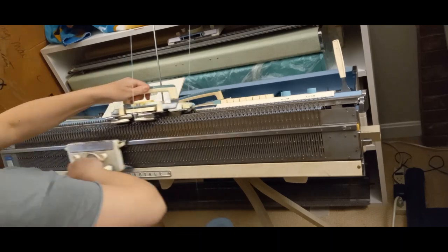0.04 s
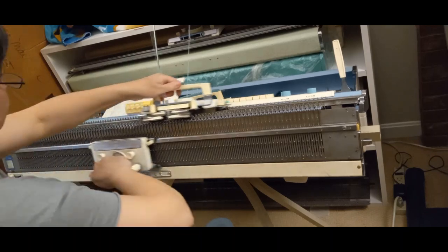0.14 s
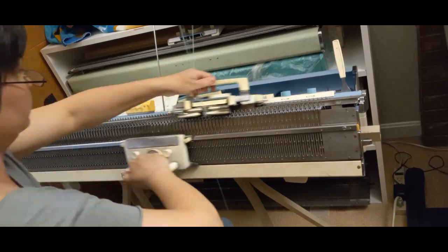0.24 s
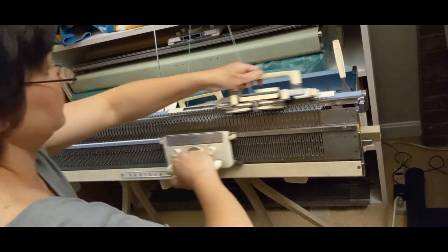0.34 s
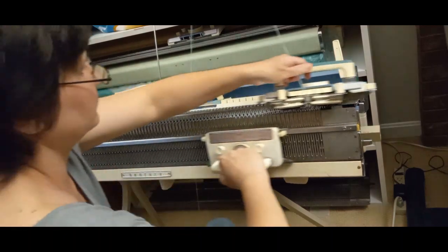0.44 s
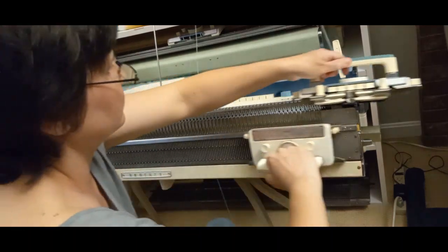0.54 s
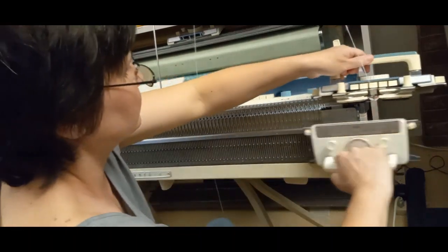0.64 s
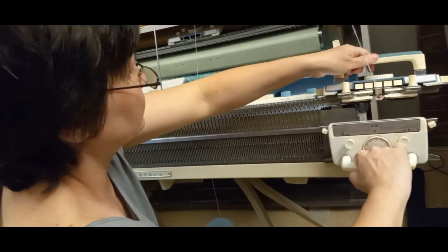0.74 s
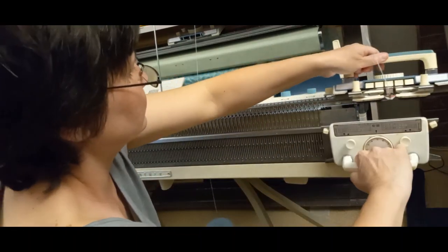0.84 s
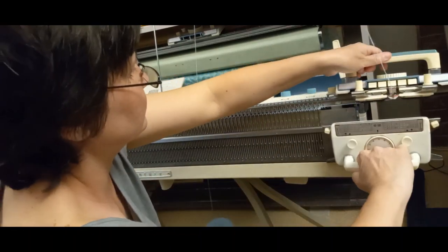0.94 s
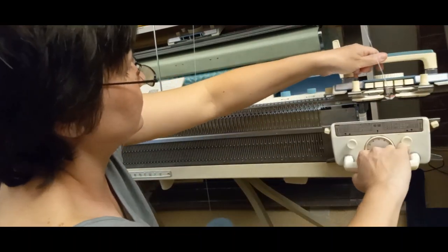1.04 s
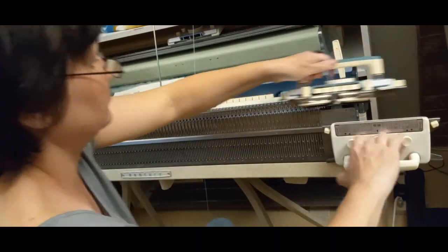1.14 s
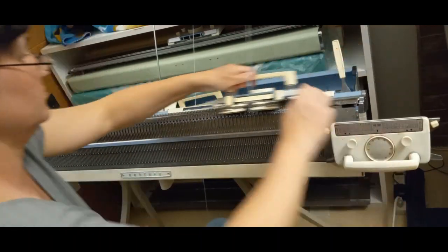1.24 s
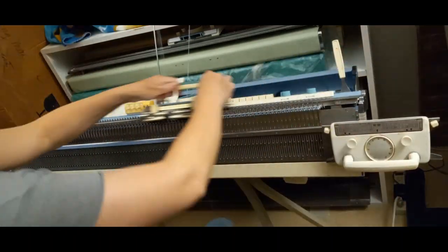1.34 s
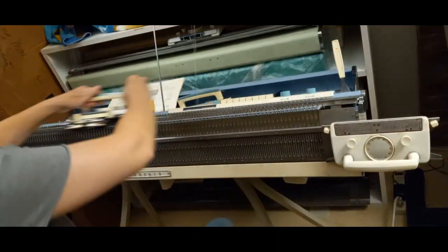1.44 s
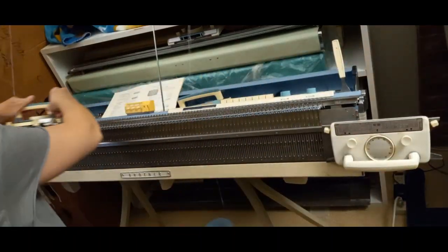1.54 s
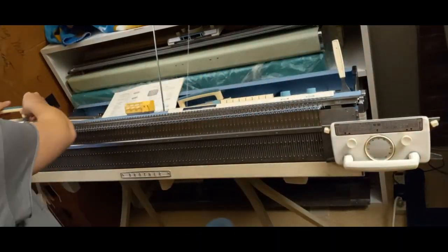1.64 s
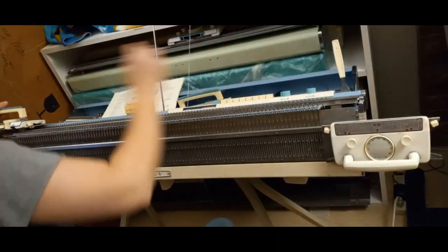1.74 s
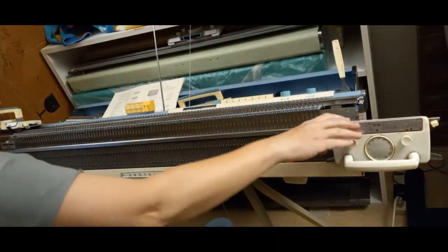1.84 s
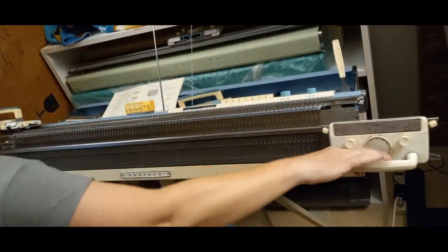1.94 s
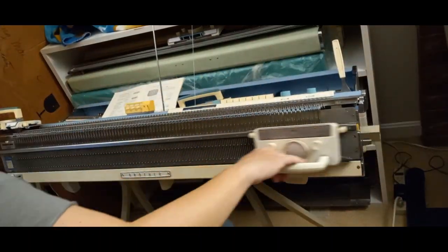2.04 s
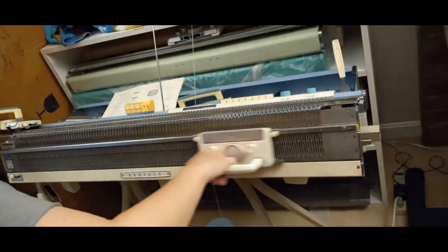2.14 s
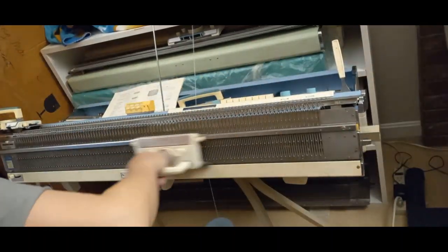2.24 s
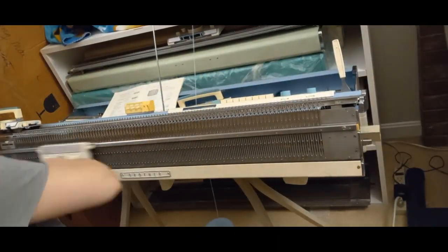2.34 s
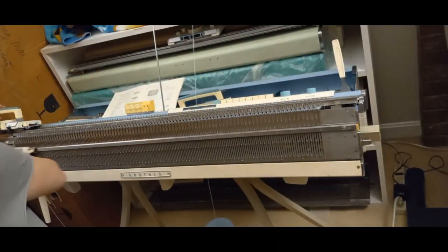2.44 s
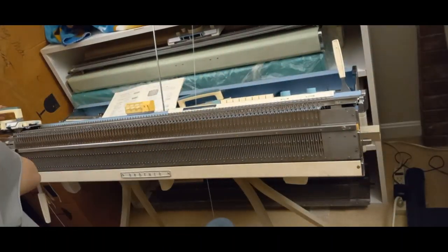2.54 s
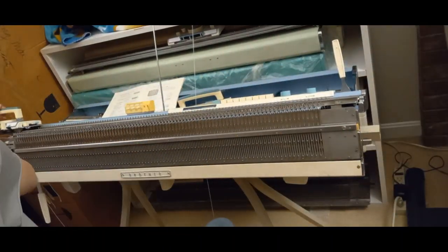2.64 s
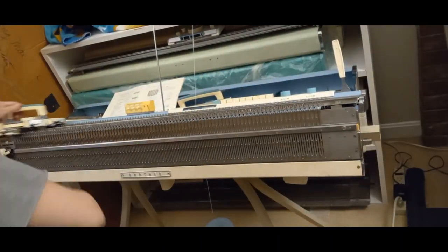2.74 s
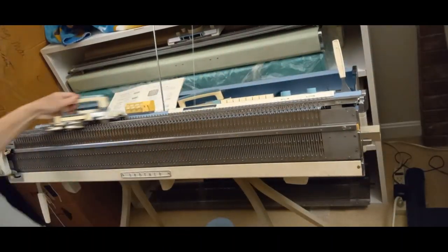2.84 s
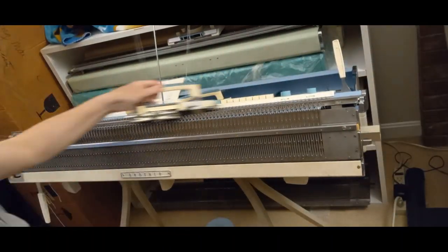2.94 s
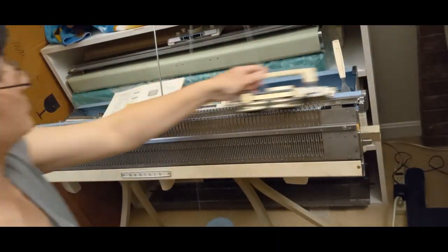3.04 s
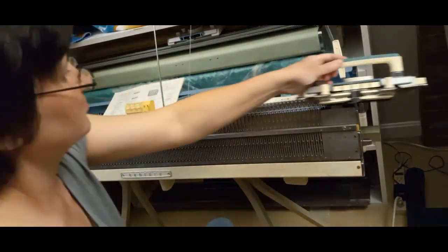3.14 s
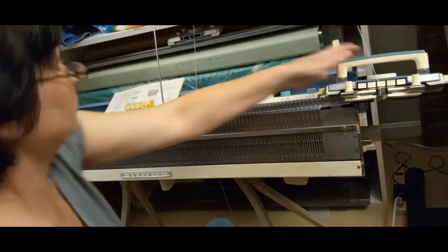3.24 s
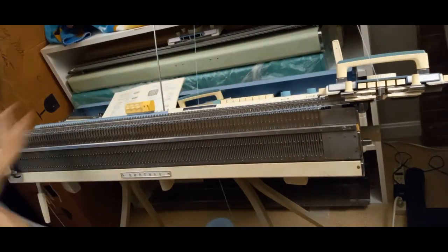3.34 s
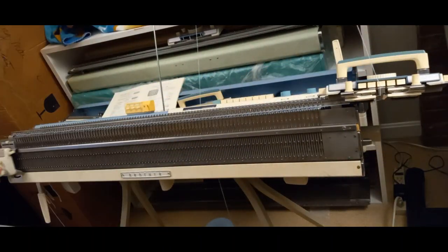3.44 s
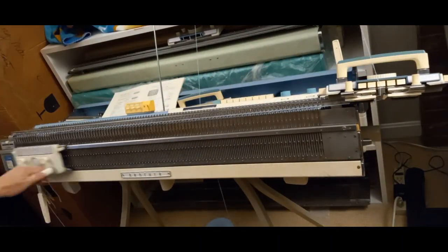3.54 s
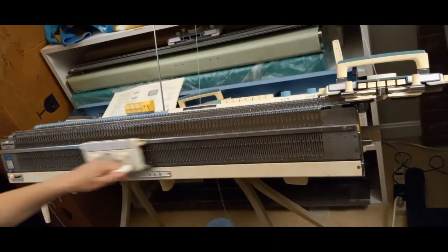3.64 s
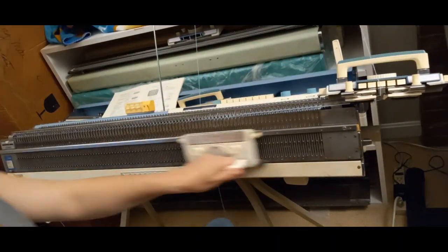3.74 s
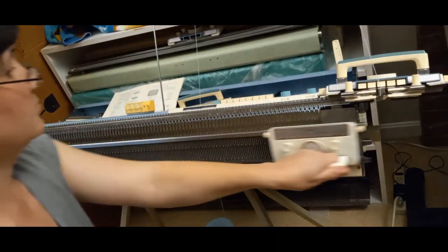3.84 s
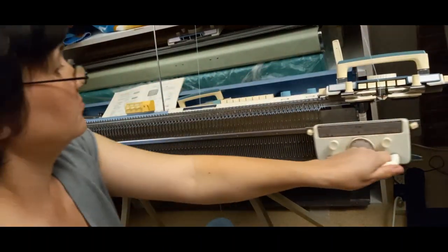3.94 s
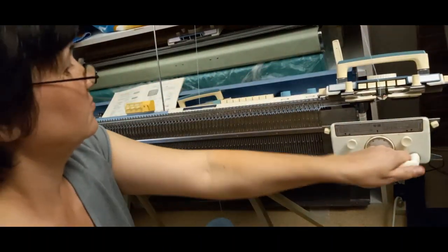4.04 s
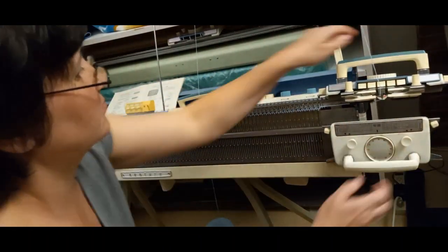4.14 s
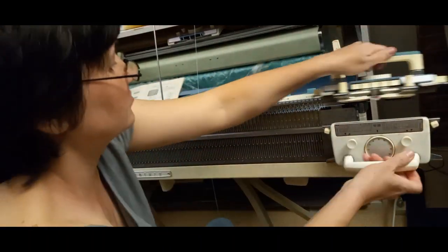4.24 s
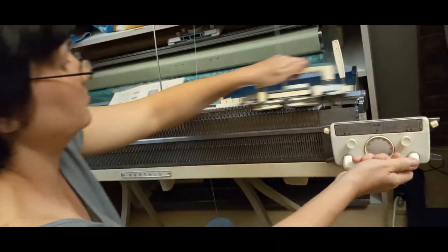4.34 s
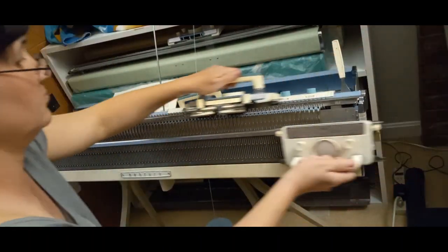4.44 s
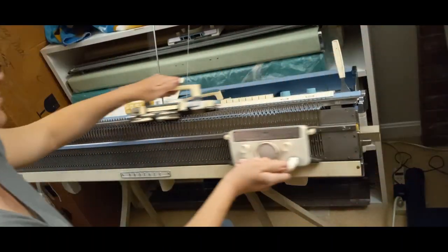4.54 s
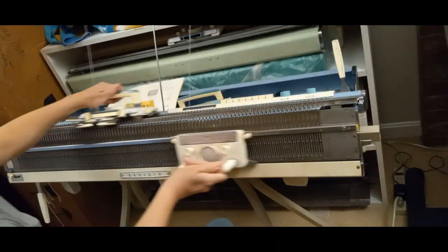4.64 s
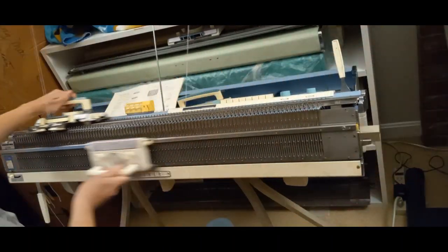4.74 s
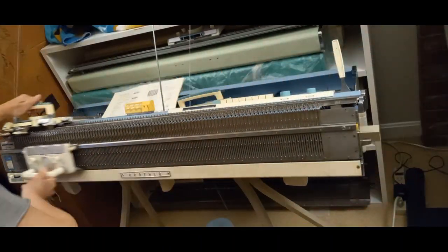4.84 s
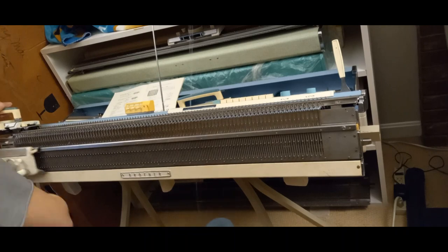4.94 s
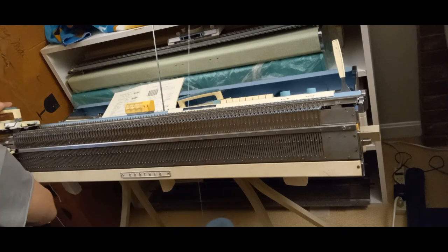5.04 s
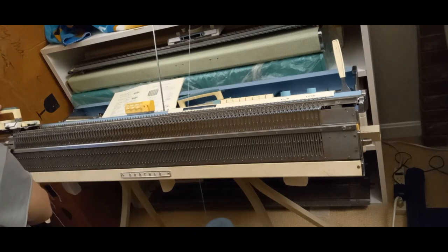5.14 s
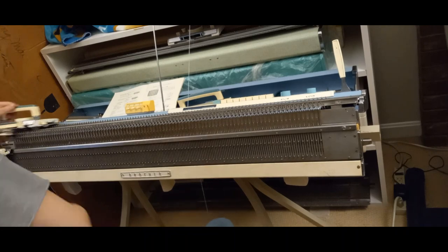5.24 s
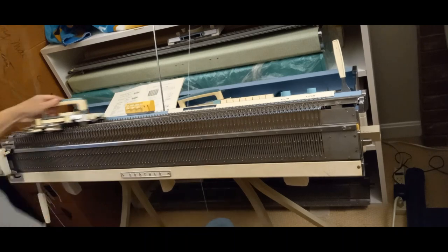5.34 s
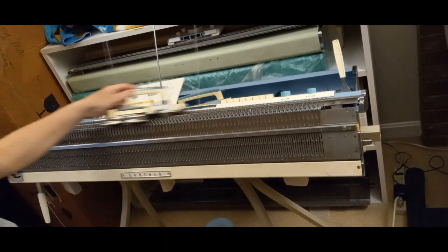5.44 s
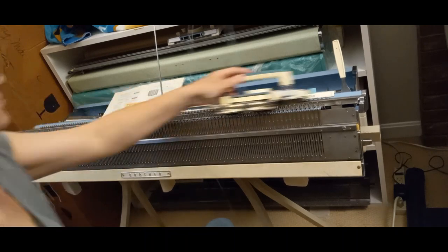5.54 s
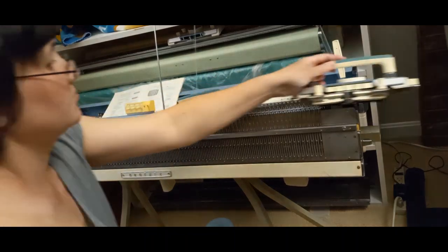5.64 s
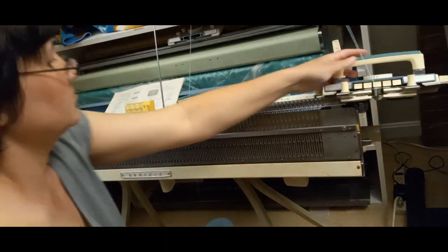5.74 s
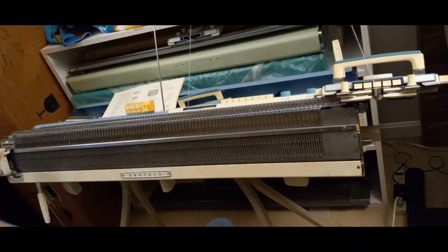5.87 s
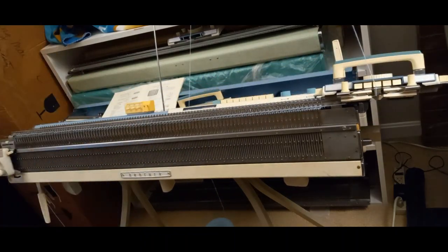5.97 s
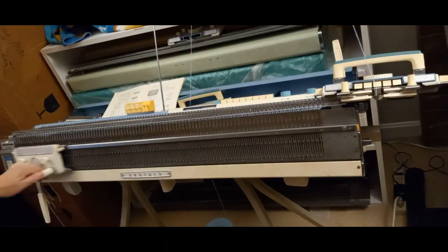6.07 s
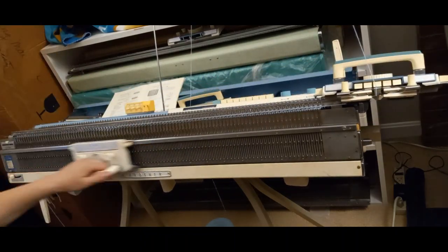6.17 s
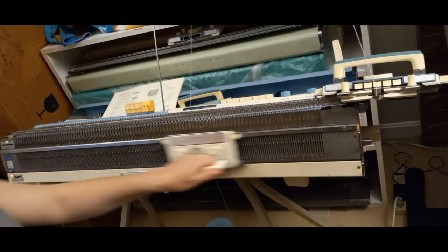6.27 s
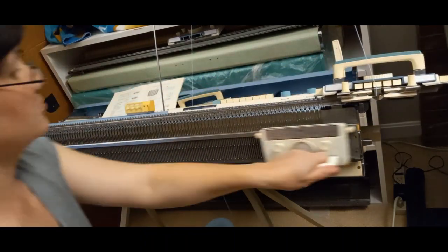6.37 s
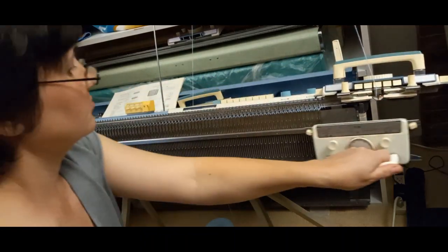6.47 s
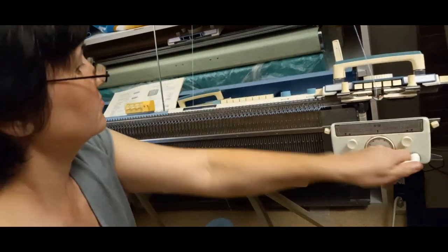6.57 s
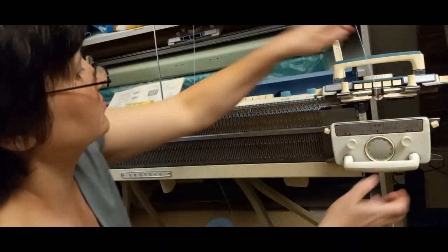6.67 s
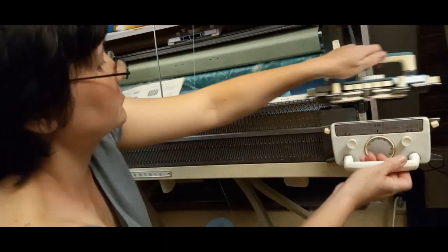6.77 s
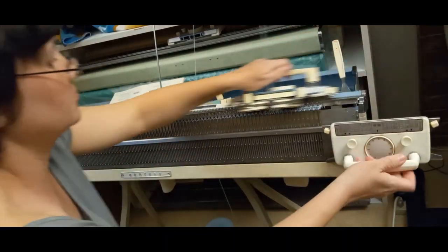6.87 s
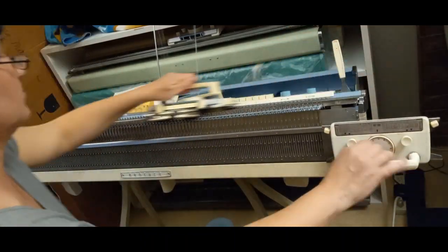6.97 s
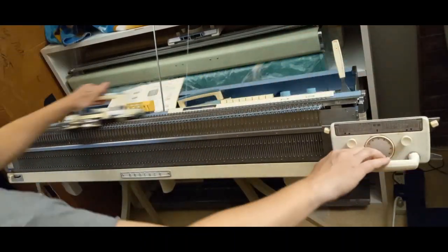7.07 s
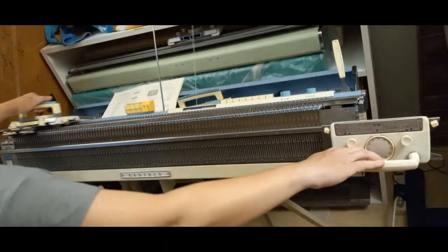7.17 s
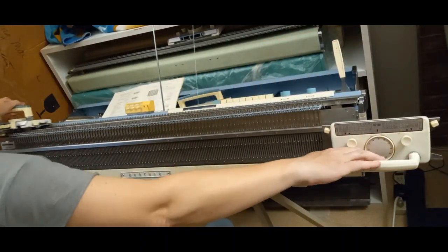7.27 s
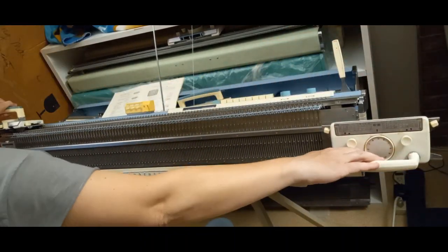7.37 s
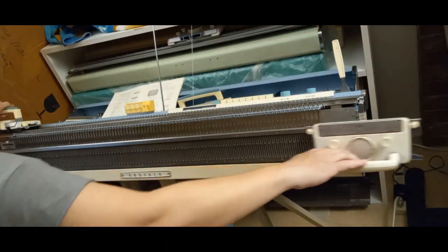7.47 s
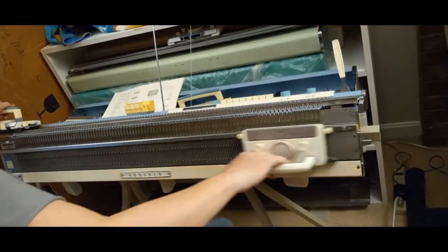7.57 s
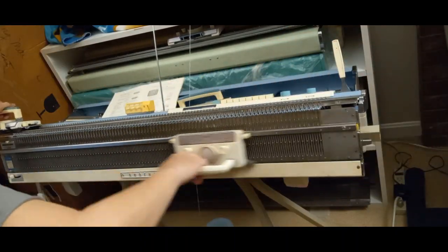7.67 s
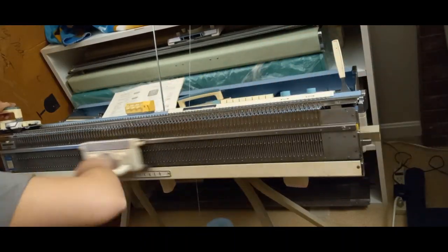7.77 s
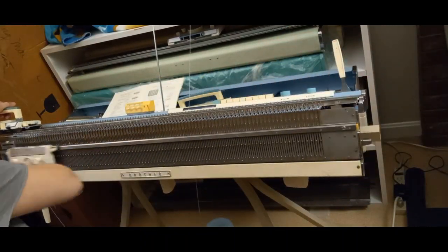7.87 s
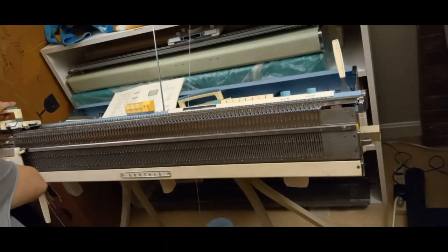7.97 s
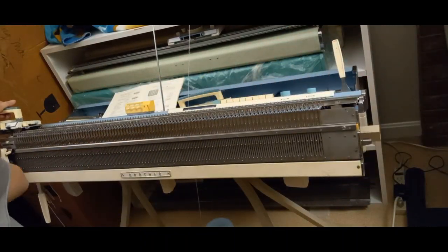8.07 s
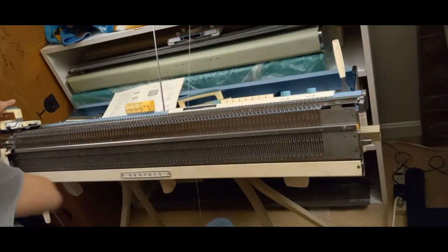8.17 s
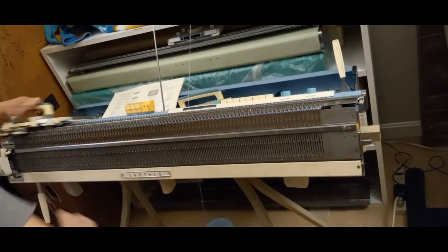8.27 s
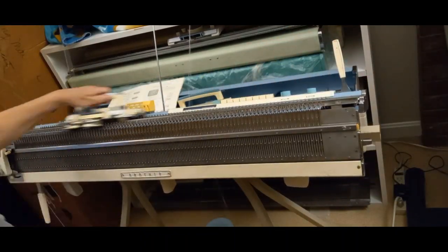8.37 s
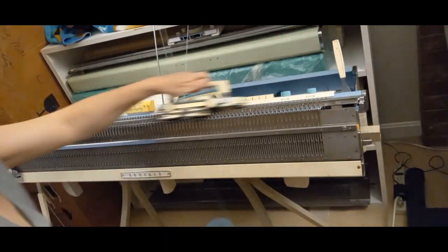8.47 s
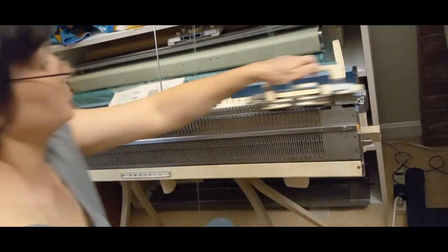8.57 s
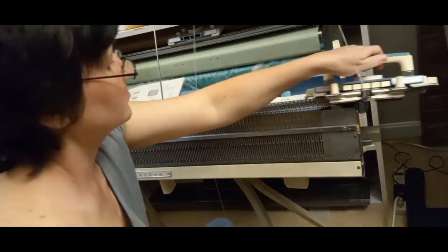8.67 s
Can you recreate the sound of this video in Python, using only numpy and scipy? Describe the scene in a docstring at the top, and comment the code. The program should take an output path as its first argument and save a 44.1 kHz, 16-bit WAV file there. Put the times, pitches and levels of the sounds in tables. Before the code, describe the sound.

Harsh rasping slides of two knitting machine carriages sweep back and forth over needle beds, with sharp clacks at each end, in a small room.

```python
"""Close stereo pair at a hand-pushed knitting machine in a small soft room, with hiss and a low wavering hum.
Both carriages run first, then after clicks and a short move the metal one on the back bed and the plastic
one on the front bed take turns; both run once more midway, then the turns go on to the end.
Their cams knock needle butts, random spikes in noise that blur to a rasp whose level follows the speed.
Levers and stops click as bursts of dying noise and ringing modes; hands and yarn brush between passes."""
import sys
import numpy as np
from scipy import signal
from scipy.fft import rfft, irfft, next_fast_len
from scipy.io import wavfile

SR = 44100
rng = np.random.default_rng(int(sys.argv[2]) if len(sys.argv) > 2 else 0)


def inscribe(sig):
    """Save sig as 16-bit PCM at rate SR to the path in sys.argv[1].

    A 1-D sig is mono; a 2-D sig holds one channel per row.
    Samples are clipped to [-1, 1] before scaling.
    """
    pcm = np.round(np.clip(np.atleast_2d(sig).T, -1, 1) * 32767)
    wavfile.write(sys.argv[1], SR, pcm.astype(np.int16))


N = 384111
SLOW_T = np.arange(N // 40 + 2) * 40 / SR   # s, one step every 40 samples


def amp(db):
    """Gain of a level in dB."""
    return 10 ** (np.asarray(db) / 20)


def rms_one(x):
    """Scaled to rms 1."""
    return x / np.sqrt(np.mean(x ** 2) + 1e-20)


def at_hz(points, hz):
    """A spectrum read on a log-frequency axis."""
    points = np.array(points)
    return np.interp(np.log(hz), np.log(points[:, 0]), points[:, 1])


def smooth(slow):
    """A value given at every 40th sample, at every sample."""
    return np.interp(np.arange(N) / 40, np.arange(len(slow)), slow)


def drift(rate_hz):
    """Slow random wander of rms 1, at every 40th sample: noise through two equal low-passes."""
    r = np.exp(-80 * np.pi * rate_hz / SR)
    white = rng.standard_normal(N // 40 + 2002)
    return rms_one(signal.lfilter([1], [1, -2 * r, r * r], white)[2000:])   # settled part only


def band(x, low_hz, high_hz):
    """Band-pass."""
    return signal.sosfilt(signal.butter(2, [low_hz, high_hz], "band", fs=SR, output="sos"), x)


def resonance(x, hz, width_hz):
    """Two-pole peak, gain 1 on top."""
    r = np.exp(-np.pi * width_hz / SR)
    zeros = np.array([1, 0, -1]) * (1 - r * r) / 2
    poles = [1, -2 * r * np.cos(2 * np.pi * hz / SR), r * r]
    return signal.lfilter(zeros, poles, x)


def hiss(colour):
    """Steady stereo noise of a given spectrum, mid rms 1."""
    size = next_fast_len(N)
    grid_hz = np.maximum(np.fft.rfftfreq(size, 1 / SR), 1)
    spectrum = rfft(rng.standard_normal((2, size))) * amp(at_hz(colour, grid_hz))
    out = irfft(spectrum, size)[:, :N]
    return out / np.std(out.mean(0))


def stereo(mid_side, hz):
    """Left and right as alike and as balanced as the two microphones are at this pitch."""
    # likeness of the two microphones: pitch_hz, likeness (-1 to 1)
    likeness = [(60, -0.03), (150, 0.021), (380, 0.13), (950, 0.15), (2380, 0.25), (5980, 0.086),
                (15000, -0.08)]
    # balance of the two microphones: pitch_hz, left_over_right_db
    lean = [(60, -1.5), (180, -1.5), (550, -1), (1650, -0.5), (4970, -0.5), (15000, 0.5)]
    alike = at_hz(likeness, hz)
    mid = np.sqrt(1 + alike) * mid_side[0]
    side = np.sqrt(1 - alike) * mid_side[1]
    pair = mid + side * [[1], [-1]]
    return pair * amp(at_hz(lean, hz) * np.array([[.5], [-.5]]))


def room():
    """Steady hiss of the room and a low hum, a band of noise whose level wavers."""
    # spectrum of the hum: pitch_hz, relative density_db per Hz
    hum_colour = [(88, -65), (150, -29), (204, -15.5), (308, 3), (345, 2.5), (432, -3), (498, 0),
                  (583, -10.5), (633, -11), (792, -7.5), (900, -17), (1170, -50), (1980, -120)]
    # course of the hum: time_s, level_db
    hum_course = [(0.849, -54), (1.099, -47), (1.821, -55), (1.969, -47.5), (2.699, -58), (3.349, -54.5),
                  (4.149, -55), (5.239, -53), (5.899, -56.5), (6.599, -57.5), (6.739, -51.5),
                  (7.459, -53.5), (8.207, -56)]
    # spectrum of the room hiss: pitch_hz, relative density_db per Hz
    room_colour = [(18, -70), (30, -40), (124, -21), (266, -5), (328, -10), (486, -22), (649, -7),
                   (1250, 1), (1670, -4.5), (14800, -23.5), (16000, -25)]
    time_s, hum_db = np.transpose(hum_course)
    hum = amp(np.interp(np.arange(N) / SR, time_s, hum_db)) * hiss(hum_colour)
    return hum + amp(-58.5) * hiss(room_colour)


def tail(x):
    """Short diffuse echo of a soft room: dying noise, a different one on each side."""
    t60_s, gap_s = 0.051, 0.004
    t = np.arange(SR // 3) / SR
    echo = rng.standard_normal((2, len(t))) * amp(-60 * t / t60_s) * (t > gap_s)
    echo = echo / np.linalg.norm(echo, axis=1, keepdims=True)
    return signal.fftconvolve(x, echo, axes=1)[:, :N]


def held_tones():
    """Wavering tones, with a rough skirt of noise as wide as the resonance."""
    # tones of the stand, a carriage plate and a low hum: # start_s, end_s, pitch_hz, width_hz, level_db, clean
    # share (0-1)
    tones = [(0.074, .48, 481, 12, -38.5, 0.51), (.42, 0.743, 486, 8.3, -49, 1),
             (4.424, 4.797, 1870, 220, -32, 0.2), (5.686, 7.1, 326, 16, -57, 0.8)]
    out = np.zeros((2, N))
    for start, end, hz, width_hz, db, clean in tones:
        span = slice(round(start * SR), round(end * SR))
        t = np.arange(N)[span] / SR
        edges = np.clip(np.minimum(t - start, end - t) / 0.073, 0, 1)   # fades of 73 ms
        swell = edges * smooth(amp(db + 0.89 * drift(5.1)))[span]
        pitch_hz = hz + 1.0 * smooth(drift(3.7))[span]
        tone = np.sqrt(2) * np.sin(2 * np.pi * np.cumsum(pitch_hz) / SR)
        rough = rms_one(resonance(rng.standard_normal((2, len(t))), hz, width_hz))
        out[:, span] += swell * (clean * tone + (1 - clean) * rough)
    return out


def brushing():
    """Soft rubbing noise of hands and yarn; where it touches the carriage, the body band speaks."""
    # rubs between passes: start_s, length_s, level_db, change_db over the length, body_over_level_db
    brushes = [(0.733, 0.25, -49.5, -6.5, -8), (1.0, 0.18, -51.5, 3, -4), (1.73, 0.18, -59, 1, -11),
               (1.92, 0.17, -52.5, 9, -3.5), (2.602, 0.074, -58, -5, 0), (3.24, 0.3, -58.5, -1.5, 2),
               (3.282, 0.15, -65.5, -1, 15), (4.032, 0.35, -61.5, 3, -1.5), (5.11, 0.088, -57, 2, 3),
               (5.195, 0.13, -56, 2, -4), (5.75, 0.22, -55.5, -3.5, -1), (5.956, 0.076, -58, 13, -9),
               (6.573, 0.085, -58, -3, -9), (6.67, 0.16, -59.5, 4, -13), (7.38, 0.2, -57.5, 5.5, -10),
               (8.087, 0.063, -49, -7, 1), (8.146, .17, -61, 8.5, -7)]
    # spectrum of the rub: pitch_hz, relative density_db per Hz
    brush_colour = [(350, -21), (600, 1), (834, -15), (869, -1), (1700, -11), (3630, -11.5), (6730, -13.5),
                    (16000, -15.5)]
    edge_s, catches_per_s = 0.008, 150
    soft, body = np.zeros((2, len(SLOW_T)))
    for start, length, db, change_db, body_db in brushes:
        t = SLOW_T - start
        edges = np.clip(np.minimum(t, length - t) / edge_s, 0, 1)
        level = edges * amp(db + change_db * np.clip(t / length, 0, 1))
        soft = soft + level
        body = body + level * amp(body_db)
    ticks = (rng.random(N) < catches_per_s / SR) * rng.standard_normal(N)   # the rub catches and slips
    rub = rms_one(resonance(rng.standard_normal((2, N)) + 5.2 * ticks, 1610.0, 710.0))
    soft_noise = smooth(soft * amp(1.3 * drift(27))) * hiss(brush_colour)
    body_noise = smooth(body * amp(4.0 * drift(10))) * rub
    return soft_noise + body_noise


def clicks():
    """Each click is a low thump, dying noise strongest where the struck parts ring, and body modes."""
    # single clicks: time_s, struck part, relative level_db, case_db and treble_db (relative to the crack),
    # t60_s, left_over_right_db
    click_list = [(0.6693, "jolt", -12.5, -5, -8, 0.041, -5), (0.723, "latch", -19, -15, -3, 0.056, -1),
                  (0.9787, "knob", -9.5, -4, -6.5, 0.069, -1.5), (0.9907, "tick", -29, 4, -14, 0.12, 1),
                  (1.13, "tick", -35.5, 4, 9, .065, 0), (1.163, "cam", -32, -7, -6, .065, -3),
                  (1.1863, "cam", -23, -17, -2, .065, -1), (1.6989, "back stop", -16, -10, 5.5, 0.068, 0),
                  (1.9024, "knob", -21.5, -19, 3.5, .065, 0), (2.0537, "cam", -12, -19, 0, .059, 4),
                  (2.5057, "tick", -15, -22, -6, 0.058, 3), (2.581, "front stop", -18, -1, 5, .039, 0),
                  (2.651, "tick", -35, -14, -10, .065, -2), (2.7985, "latch", -20, -17, 5, .065, 5),
                  (3.2295, "back stop", -17.5, -21, 4.5, 0.06, -1), (3.3026, "tick", -32, -4, -8, .1, -1),
                  (3.3786, "tick", -30.5, 0, -9, 0.17, -1), (3.489, "lever", -15, 2.5, -7, 0.2, 0.5),
                  (3.54, "jolt", -14, -3, -5, 0.057, 1), (3.55, "latch", -12, -15, -6, .05, -4),
                  (4.018, "front stop", -21, -7, 0, .069, 0), (4.1275, "knob", -30.5, -23, -7, 0.071, -5),
                  (4.28, "latch", -19, -12, 4, .065, -1), (5.013, "front stop", -12.5, -4, -12, 0.048, 6),
                  (5.0234, "latch", -22, -7, -8, .065, -2),
                  (5.094, "front stop", -16.5, -1, 3.5, 0.039, -2), (5.15, "cam", -37, 5, -8, .08, 0),
                  (5.1714, "lever", -6.5, -11, -9, 0.047, -1.5), (5.2714, "cam", -42, 3, 0, 0.07, 4),
                  (5.3128, "cam", -23, -16, 5, .065, 0), (5.327, "cam", -14, -18, -7, .082, 3),
                  (5.7442, "back stop", -16, -19, -14, 0.068, -6), (5.818, "tick", -31, -3, 1, 0.073, -3),
                  (6.013, "lever", -11.5, 0, -3, 0.086, -1), (6.0795, "jolt", -13.5, -8, -2, .065, 6),
                  (6.5547, "front stop", -19.5, -17, 0.5, 0.064, -3),
                  (6.642, "knob", -22, -5, -6, 0.11, -2), (6.7999, "cam", -36, -4, -2, .065, 0),
                  (6.845, "cam", -24, 2, 5, .065, -1), (6.866, "cam", -26, 9, -6, .08, -4),
                  (7.255, "cam", -24, 5, -8, .08, 0), (7.335, "cam", -34, 10, -8, .08, 0),
                  (7.3516, "back stop", -15.5, -9, 6.6, 0.054, 1), (7.549, "tick", -17.5, -2, -9, .065, -2),
                  (7.569, "latch", -11, -20, 2, 0.072, -1), (8.082, "front stop", -17, -2, 3.5, 0.036, 1),
                  (8.2547, "cam", -44, 11, -9, .065, 0), (8.3162, "latch", -20, 1, 1, .061, 0),
                  (8.336, "jolt", -13, -4, -5, 0.06, 1), (8.3505, "latch", -7.5, -8, -8, .065, 4)]
    # struck parts: part_ring_hz, case_ring_hz, thump_db (relative), modes_over_case_db; # "knob" holds further
    # lever clicks, with a higher case ring
    parts = {"lever": (3700, 1858, -27, -9), "knob": (3900, 2040, -36, 3),
             "back stop": (5900, 2050, -22, -6), "front stop": (3300, 1998, -15, -10),
             "cam": (3300, 1398, -13, -5), "latch": (5808, 1650, -13.5, -10), "tick": (2900, 1700, -17, -7),
             "jolt": (3600, 1700, -6, -10)}
    # modes of the carriage body: pitch_hz, relative level_db, t60_s
    body_modes = [(1290, 2, 0.037), (1450, -10, .06), (1760, -3, 0.08), (1870, -1.5, 0.08),
                  (1914, -18.5, 0.29), (2320, -1, 0.065)]
    size = SR // 6
    t, out = np.arange(size) / SR, np.zeros((2, N + size))
    thump = band(np.sin(np.pi * np.minimum(t / 0.001, 1)), 90, 4000)   # a short low thump at the start of each click
    for s, part, level_db, case_db, treble_db, t60, pan_db in click_list:
        part_hz, case_hz, thump_db, modes_db = parts[part]
        white = rng.standard_normal((3, size))
        white = 0.47 * white[0] + white[1:]   # both sides share a part of the burst
        # a hard crack, then the rattle
        fall = amp(-60 * t / t60) * 0.65 + amp(-60 * t / 0.02)
        burst = 0.79 * rms_one(band(white, 2200, 8470))
        burst = burst + 0.39 * rms_one(resonance(white, part_hz, 510.0))
        burst = burst + amp(treble_db) * rms_one(band(white, 5700, 17200))
        case = 0.31 * rms_one(band(white, 910, 3750)) + 0.69 * rms_one(resonance(white, case_hz, 350.0))
        # a blow wakes the modes that lie near its own ring
        ringing = np.zeros(size)
        for hz, mode_db, ring_s in body_modes:
            extra, phase = rng.random(2)
            off_db = 7.5 * ((case_hz - hz) / 90) ** 2
            gain = amp(mode_db + 2.4 * extra - 60 * t / ring_s - off_db)
            ringing += gain * np.sin(2 * np.pi * (hz * t + phase))
        one = 0.26 * (burst + amp(case_db) * case) * fall * np.minimum(t / 0.00045, 1)
        one = one - amp(thump_db) * thump
        one = one + amp(case_db + modes_db) * ringing * np.minimum(t / 0.0013, 1)
        at = round(s * SR)
        out[:, at:at + size] += amp(level_db + pan_db * np.array([[.5], [-.5]])) * one
    return out[:, :N]


def strokes(carriage):
    """Rumble, body and rasp levels of a kind of pass, as powers of its speed, at every 40th sample."""
    # passes along the beds: start_s, carriage, speeding_up_s, full_speed_s, slowing_down_s, # creep_before_s,
    # creep_after_s, creep share of full speed, relative rasp_db, change_db over the pass, # jerk_db at
    # breakaway, body_over_rasp_db (1-2.5 kHz), rumble_over_rasp_db (below 1 kHz)
    passes = [(0.0, "both", 0.00072, 0.54, 0.18, .01, 0.014, 0.035, -24, -0.5, 0.5, -0.5, -1),
              (0.645, "both", 0.026, 0.021, 0.023, .01, .05, 0.1, -24.5, 0.5, -3.5, 0.5, 2),
              (1.18, "back", 0.058, 0.33, .11, 0.042, 0.021, 0.063, -23.5, 0.5, -0.5, 1, 0.5),
              (2.043, "front", 0.0098, 0.41, 0.1, 0.035, .02, 0.16, -23.5, -1, 0.5, 1.5, 0),
              (2.792, "back", 0.044, .29, 0.077, 0.0031, .035, .06, -20, -5, 1, 0.5, 0),
              (3.528, "front", 0.017, .32, 0.13, 0.046, 0.023, 0.071, -22, -2, 3.5, -0.5, 0),
              (4.321, "both", 0.071, .5, .21, 0.027, .01, 0.18, -23.5, 0, 1.5, 0, -0.5),
              (5.305, "back", .037, 0.3, 0.073, .005, .035, 0.066, -20.5, -3.5, 1, 0.5, -0.5),
              (6.07, "front", 0.016, .36, 0.084, .04, 0.024, 0.095, -23, -2.1, 3, 1, 1.5),
              (6.852, "back", 0.045, 0.28, 0.1, 0.063, .005, 0.13, -23, 0, 0, 1.5, 0),
              (7.235, "back", 0.023, 0.028, 0.052, .005, 0.042, 0.23, -32.5, 3.5, -4.5, 4.5, 1),
              (7.558, "front", 0.047, .33, 0.13, 0.024, 0.033, 0.13, -23, -1, 3, -0.5, -1),
              (8.315, "back", 0.034, 0.3, 0.069, .005, .01, .05, -19, -5.5, 1.5, 0, -0.5)]
    # growth of rumble, body, rasp: power of the speed
    speed_power = [0.78, 0.69, 0.98]
    # jerk felt in rumble, body, rasp: dB per dB of jerk
    jerk_share = [1.55, 2.2, 1.01]
    jerk_fade_s, creep_edge_s = 0.018, 0.024
    out = np.zeros((3, len(SLOW_T)))
    for (start, who, up, full, down, before, after, creep,
         db, change_db, jerk_db, body_db, rumble_db) in passes:
        if who != carriage:
            continue
        t, length = SLOW_T - start, up + full + down
        creeping = creep * np.clip(np.minimum(t + before, length + after - t) / creep_edge_s, 0, 1)
        speed = np.clip(np.minimum(t / up, (length - t) / down), creeping, 1)
        # the jerk holds while speeding up, then dies away
        jerk = jerk_db * np.exp(-np.clip(t - up, 0, 1) / jerk_fade_s)
        change = change_db * np.clip(t / (up + full), 0, 1)
        for part, above_db in enumerate((rumble_db, body_db, 0)):
            level_db = db + above_db + change + jerk_share[part] * jerk
            out[part] += amp(level_db) * speed ** speed_power[part]
    return out


def carriages():
    """Needle knocks at random, dealt over bands; each carriage lends them its colour and resonances."""
    # rasp of the metal carriage on the back bed: pitch_hz, relative density_db per Hz
    back_colour = [(18, -8), (30, -7), (179, -7), (449, -5), (600, -6), (1320, -6), (1630, -6), (1810, -9),
                   (2230, -5), (4530, -0.5), (6550, -3.5), (14400, -5.5), (16000, -5)]
    # rasp of the plastic carriage on the front bed: pitch_hz, relative density_db per Hz
    front_colour = [(18, -23), (30, -6.5), (189, -7), (437, -6), (1160, -7.5), (1280, -5.5), (2900, -4.5),
                    (4300, -4), (4650, 15.5), (5900, -4), (8080, -1.5), (14800, -3.5), (16000, -8)]
    # resonances of the back carriage plate: pitch_hz, width_hz, relative level_db
    back_plate = [(1273, 41, -23.5), (1857, 110, -26.5), (2810, 59, -21), (3250, 180, -31.5),
                  (3860, 110, -53), (4300, 170, -52), (6960, 260, -22)]
    # resonances of the front carriage plate: pitch_hz, width_hz, relative level_db
    front_plate = [(1475, 75, -23), (1900, 69, -36), (3470, 230, -20), (3900, 95, -27), (4180, 140, -44),
                   (5880, 240, -20)]
    # limits between rumble, body and rasp: pitch_hz
    range_limits = [1000, 2500]
    edges_hz = np.geomspace(22, 17000, 23)
    knocks_per_s, knock_spread_db, knocks_db = 700, 4.0, -6

    # most knocks overlap to a noise; the hardest stand out as single spikes across all bands
    hard = rng.random((2, N)) < knocks_per_s / SR
    hard = hard * amp(knock_spread_db * np.minimum(rng.exponential(1, (2, N)), 4))
    hard = hard * rng.choice([-1, 1], (2, N))
    # two noises, so that neighbouring bands get unrelated ones
    white = rng.standard_normal((2, 2, N)) + amp(knocks_db) * rms_one(hard)

    back, front, both = map(strokes, ("back", "front", "both"))
    out = np.zeros((2, N))
    uneven_push = drift(3.4) + 1.9 * drift(51)
    near = drift(9)
    for k, (low, high) in enumerate(zip(edges_hz, edges_hz[1:])):
        hz = np.sqrt(low * high)
        part = np.searchsorted(range_limits, hz)
        back_db, front_db = at_hz(back_colour, hz), at_hz(front_colour, hz)
        gain = amp(back_db) * back[part] + amp(front_db) * front[part]
        gain = gain + amp((back_db + front_db) / 2) * both[part]
        # the colour shifts in patches as the cams meet other needles
        last, near = near, drift(17.6)
        gain = smooth(gain * amp(4.0 + 0.26 * uneven_push + 0.74 * (last + near)))
        out += gain * stereo(band(white[k % 2], low, high), hz)
    for plate, rasp in ((back_plate, back[2]), (front_plate, front[2])):
        for hz, width_hz, db in plate:
            gain = smooth((rasp + 0.83 * both[2]) * amp(db + 2.9 * drift(6.4)))
            out += gain * stereo(rms_one(resonance(white[0], hz, width_hz)), hz)
    return out


def scene():
    """Room, hands and machine; only the machine is given an echo."""
    machine = carriages() + clicks()
    echo = amp(-11.5) * tail(machine)
    return room() + held_tones() + brushing() + echo + machine


def record(dry):
    """A steep low-pass cuts the top from 15950 Hz up."""
    return signal.sosfilt(signal.cheby2(16, 45, 15950, fs=SR, output="sos"), dry)


dry = scene()
out = record(dry)
inscribe(out)
```